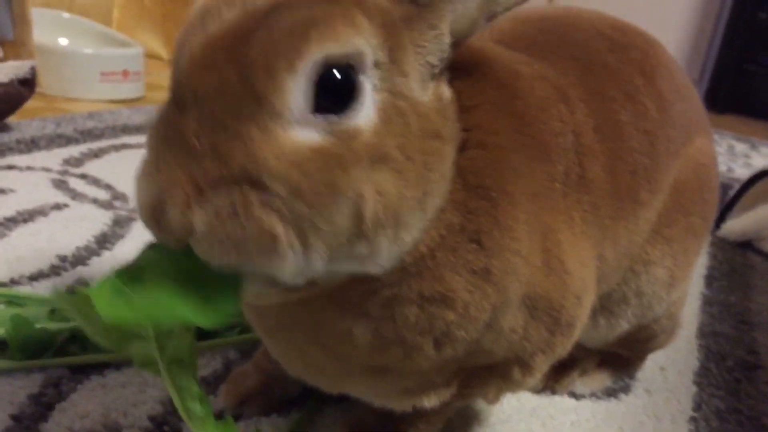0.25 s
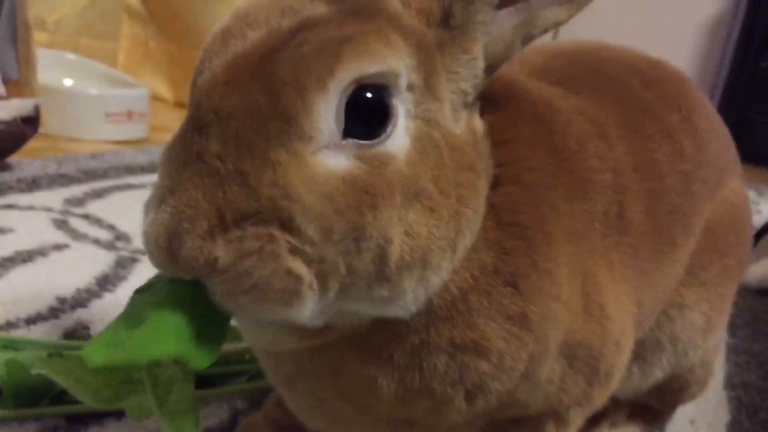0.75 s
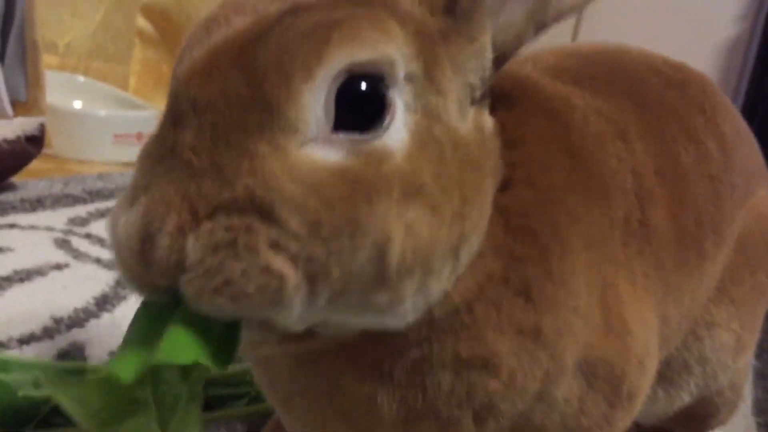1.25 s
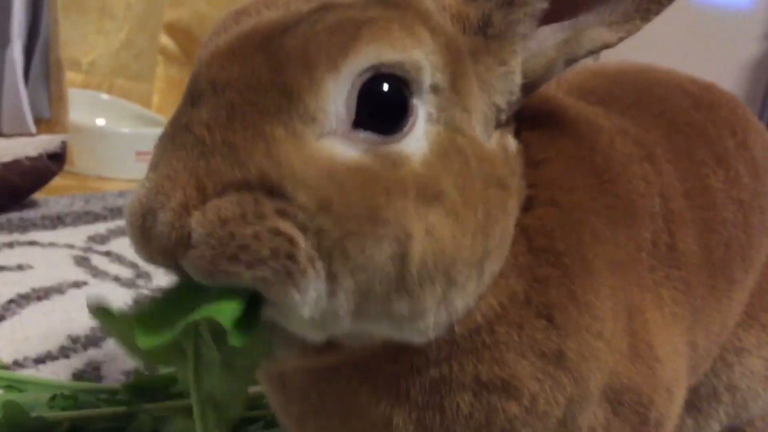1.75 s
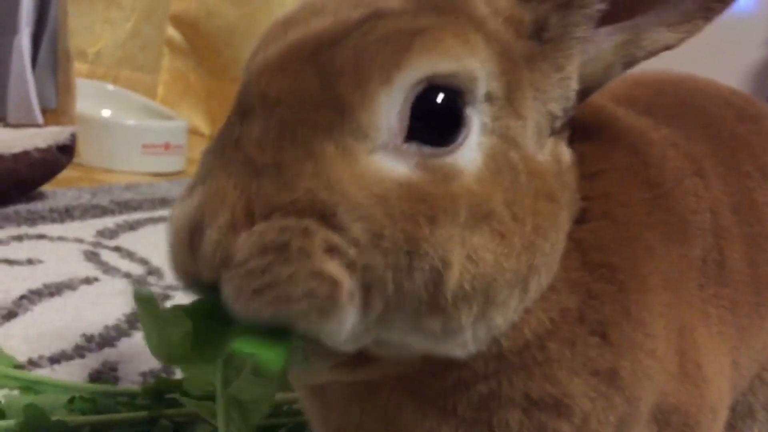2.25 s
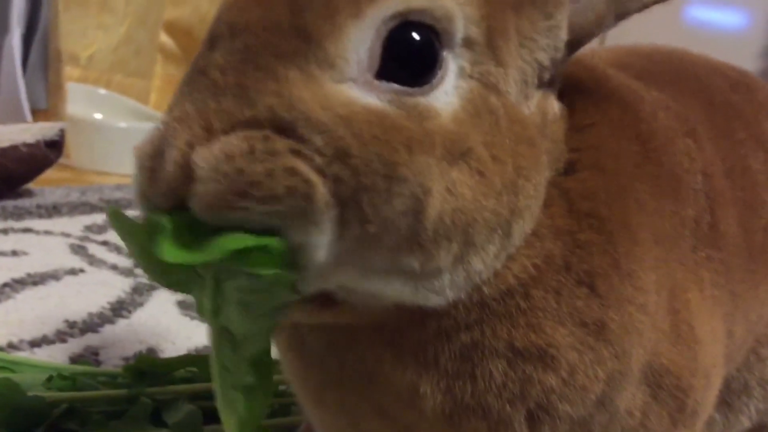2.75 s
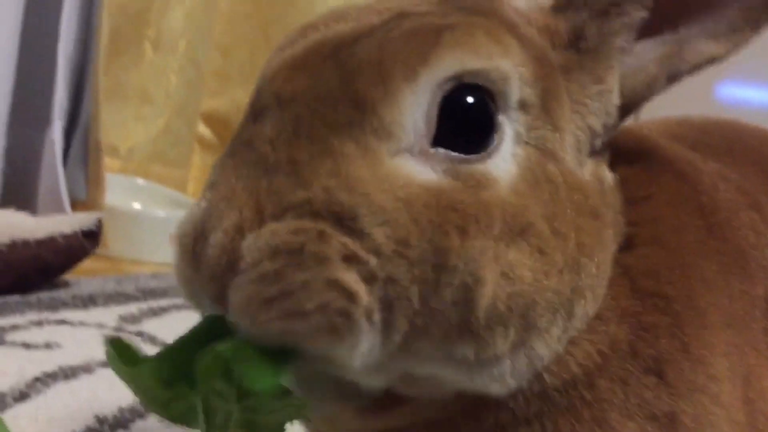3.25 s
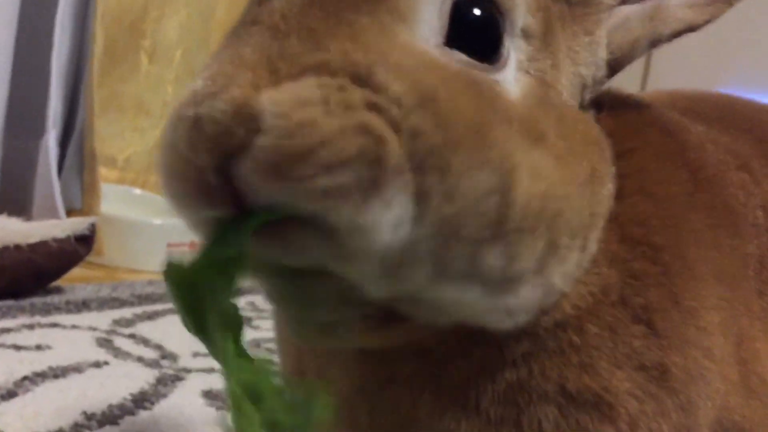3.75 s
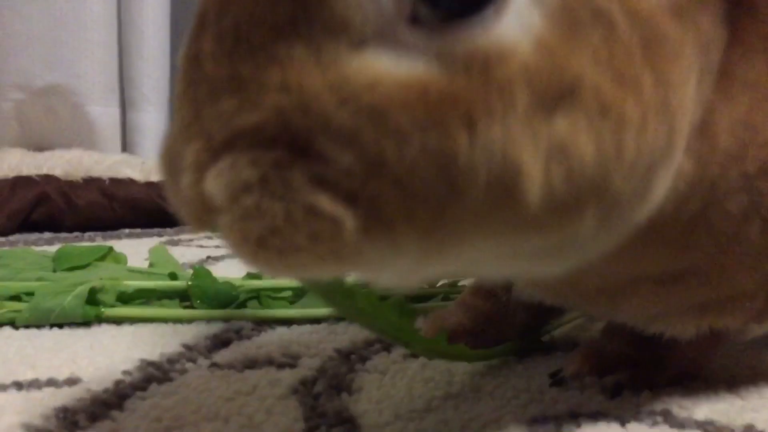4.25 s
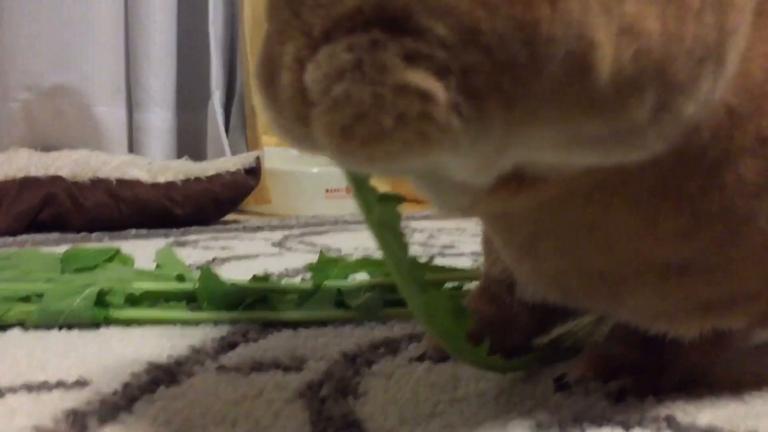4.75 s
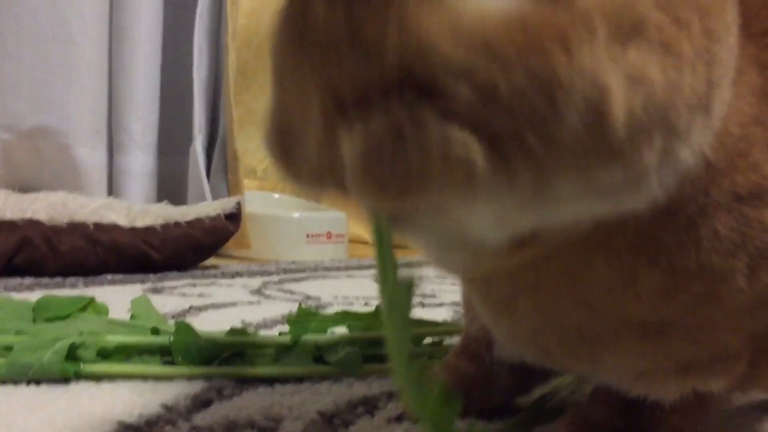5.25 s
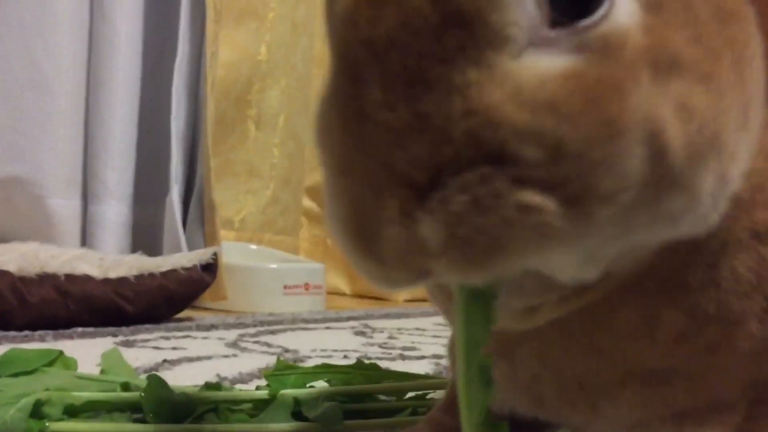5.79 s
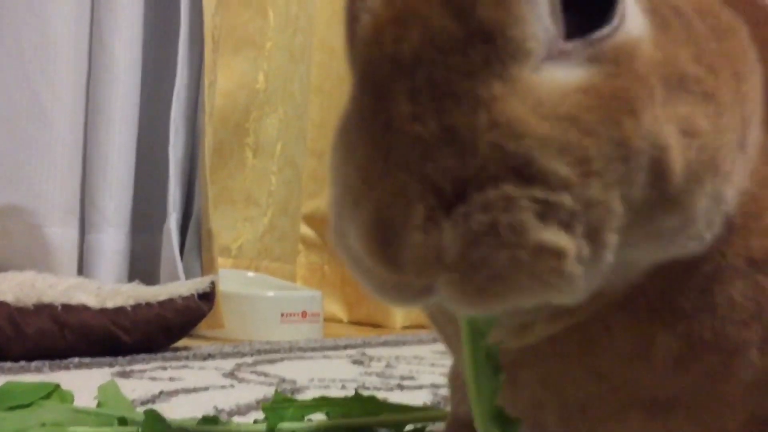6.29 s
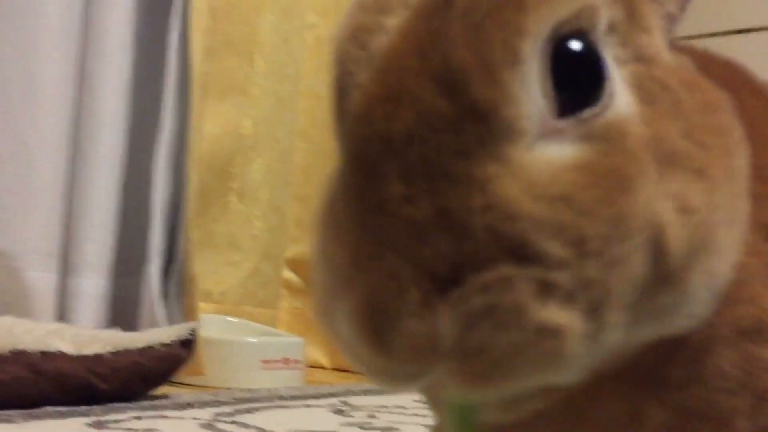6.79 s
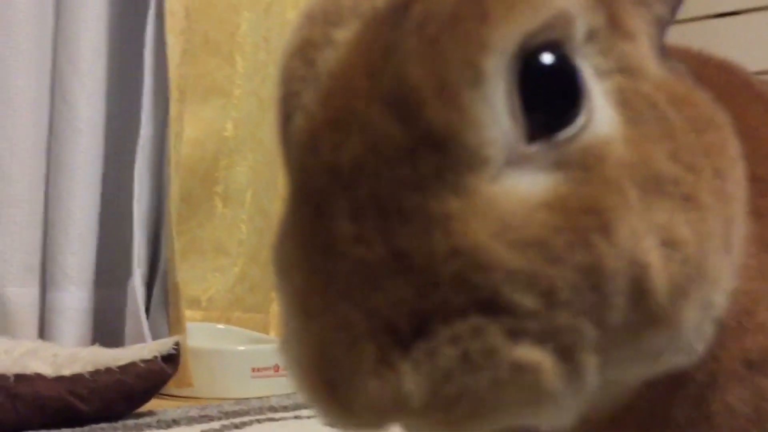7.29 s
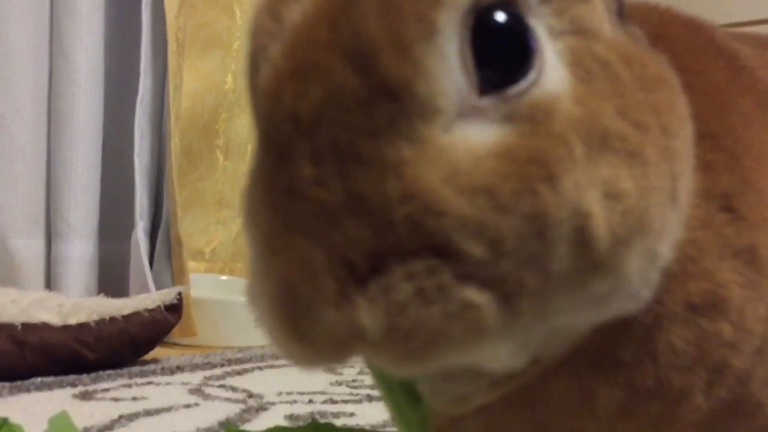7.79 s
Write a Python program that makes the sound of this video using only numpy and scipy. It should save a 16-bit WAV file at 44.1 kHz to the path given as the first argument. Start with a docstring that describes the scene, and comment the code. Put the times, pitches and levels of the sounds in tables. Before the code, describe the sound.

A rabbit munches leafy greens right at the microphone, quick crisp crunches with bright snaps and wet smacks, over a faint indoor hum.

```python
"""A rabbit chews leafy greens right at the microphone, about five bites a second.
Each crush bursts a cluster of crisp cells and slides on into a follow-up; fibres snap with a bright tick.
Wet pulp smacks in the mouth cavity while the molars keep up a faint squelch and crackle.
The handheld camera is tapped, bumped and brushed by fur now and then: dispersed knocks, thuds, slipping grains.
Behind it lie a faint mains hum, a low drone and still air."""
import sys
import numpy as np
from scipy import signal
from scipy.fft import rfft, irfft, next_fast_len
from scipy.io import wavfile
from scipy.ndimage import map_coordinates

SR = 44100
rng = np.random.default_rng(int(sys.argv[2]) if len(sys.argv) > 2 else 0)


def wav_out(sig):
    """Save sig, one row per channel (or a flat mono array), as 16-bit PCM at SR to the path in sys.argv[1]."""
    wavfile.write(sys.argv[1], SR, np.round(np.clip(np.atleast_2d(sig).T, -1, 1) * 32767).astype(np.int16))


N = 354123  # samples


def amp(db):
    """Decibels to a linear gain."""
    return 10 ** (np.asarray(db) / 20)


def unit(x):
    """x at an rms of one."""
    return x / np.sqrt(np.mean(x ** 2) + 1e-20)


def sized(x, db, seconds):
    """x with the energy of a sound that holds this level for this long."""
    return x * amp(db) * np.sqrt(seconds * SR / (np.sum(x ** 2) + 1e-20))


def around_zero(half):
    """Time axis in seconds, reaching this many samples either side of zero."""
    return np.arange(-half, half) / SR


def along(points, hz):
    """Read a curve of (f/Hz, value) points on a log frequency axis."""
    f, value = np.transpose(points)
    return np.interp(np.log(hz + 1), np.log(f + 1), value)


def add(track, s, x):
    """Mix x into the track from time s."""
    start = round(s * SR)
    a, b = max(start, 0), min(start + len(x), N)
    track[a:b] += x[a - start:b - start]


def wobble(rate):
    """A smooth random curve, rate knots a second."""
    knots = rng.standard_normal(int(N * rate / SR) + 4)
    return map_coordinates(knots, [np.arange(N) * rate / SR])


def response(gain_db, size=512, lag=lambda hz: 0):
    """Causal impulse response for a gain curve, with an optional extra phase lag in cycles."""
    hz = np.fft.rfftfreq(size, 1 / SR)
    # folding the cepstrum forward in time gives minimum phase
    cepstrum = irfft(np.log(amp(gain_db(hz)) + 1e-6))
    cepstrum[1:size // 2] *= 2
    cepstrum[size // 2 + 1:] = 0
    return irfft(np.exp(rfft(cepstrum) - 2j * np.pi * lag(hz)))


def coloured(x, spectrum, size=1024):
    """x through a spectrum that drops 20 dB in the octave beyond each end."""
    (low_hz, low_db), (high_hz, high_db) = spectrum[0], spectrum[-1]
    closed = [(low_hz / 2, low_db - 20), *spectrum, (high_hz * 2, high_db - 20)]
    return signal.fftconvolve(x, response(lambda hz: along(closed, hz), size))[:len(x)]


def band_limited(x):
    """A steep cut: nothing passes from 16.1 kHz up."""
    size = next_fast_len(len(x) + 256)
    passes = np.fft.rfftfreq(size, 1 / SR) < 16100
    return irfft(rfft(x, size) * passes, size)[:len(x)]


def bending(delay):
    """Phase lag in cycles of a bending wave that takes this long at 1 kHz: low notes travel slower."""
    return lambda hz: 2 * delay * np.sqrt(1e3 * hz)


def swell(t, length, skirt, attack=1.14):
    """A rise and fall around t = 0; the pressure builds faster than it lets go."""
    steepness = skirt / 2 * np.where(t < 0, attack, 1)
    return (1 + (2 * t / length) ** 4) ** -steepness


def grains(count, rate, spread_db):
    """Tiny impulses at random moments, rate a second, of random size and sign."""
    happens = rng.random(count) < rate / SR
    size = amp(spread_db * np.minimum(rng.standard_normal(count), 2))
    return happens * size * rng.choice([-1, 1], count)


def splinter(t60, ring):
    """One rupture: a jolt and a very short ring of random colour."""
    t = np.arange(SR // 200) / SR
    crack = ring * rng.standard_normal(len(t)) * amp(-60 * t / t60)
    crack[0] += 1
    return crack


def crackle(length, rate, spread_db, count):
    """Ruptures in several patches of tissue, each patch with its own colour."""
    patches = []
    for _ in range(count):
        ruptures = grains(length, rate / count, spread_db)
        patches.append(signal.fftconvolve(ruptures, splinter(t60=0.0029, ring=1.0))[:length])
    return unit(sum(patches))


# partials of the mains hum: f/Hz, mean level/dB rms
HUM_PARTIALS = [(60, -82), (120, -56), (180, -60), (240, -69.5)]
# colour of the still air: f/Hz, relative level/dB
AIR_COLOUR = [(25, -30.5), (48, -2.5), (100, 0), (185, -0.5), (330, -11.5), (775, -17.5), (2000, -19),
              (2900, -24), (4200, -20), (4900, -24), (6700, -28.5), (10400, -24.5), (13600, -30),
              (16000, -39)]


def room():
    """An appliance hums on the mains, a little unsteadily, over a low noise drone and still air."""
    t = np.arange(N) / SR
    hum = np.zeros(N)
    for hz, db in HUM_PARTIALS:
        level = np.sqrt(2) * amp(db + 0.53 * wobble(13))
        hum += level * np.sin(2 * np.pi * hz * t + 0.11 * wobble(2.06))
    # f/Hz, relative level/dB
    drone_colour = [(40, -15.5), (60, 2.5), (95, -11.0), (135, 1.0), (175, 3.5), (230, -10.5), (330, -17.5)]
    drone = unit(coloured(rng.standard_normal(N), drone_colour, size=8192))
    air = unit(coloured(rng.standard_normal(N), AIR_COLOUR, size=8192))
    return hum + amp(-58.0 + 0.51 * wobble(7.2)) * drone + amp(-53.5) * air


def nearby(x, t60, wet_db):
    """The bowl, floor and furniture scatter a short, weak answer: a decaying noise tail."""
    t = np.arange(SR // 8) / SR
    tail = rng.standard_normal(len(t)) * amp(-60 * t / t60) * (t > .001)
    return x + amp(wet_db) * signal.fftconvolve(x, tail / np.linalg.norm(tail))[:N]


# fur brushing the camera: centre t/s, length/s, level/dB, share of scrape [0-1]
BRUSH_STROKES = [(6.364, 0.11, -56.5, .1), (6.551, 0.31, -58.5, .1), (6.659, 0.11, -48.5, .05),
                 (6.884, 0.098, -44.5, 0.55), (6.971, 0.13, -57, 0.15)]
# colour of soft fur: f/Hz, relative level/dB
FUR_COLOUR = [(250, -2.5), (650, 2), (1200, 1.5), (2200, -1.5), (3000, -7.5), (4300, -6.5), (8000, -25),
              (13000, -20)]
# colour of the scrape: f/Hz, relative level/dB
SCRAPE_COLOUR = [(1000, -22), (1400, -6), (1850, -3), (2300, -16)]


def brushing():
    """Hairs slip over the case in short strokes of fine grains; each stroke has its own share of scrape."""
    out, t = np.zeros(N), around_zero(SR // 4)

    def slips(colour, length):
        """Hairs letting go one by one under a single stroke, at unit rms."""
        stroke = grains(len(t), rate=3100, spread_db=-2) * swell(t, length, skirt=2.4)
        return unit(coloured(stroke, colour))

    for s, length, db, scrape_share in BRUSH_STROKES:
        soft = (1 - scrape_share) * slips(FUR_COLOUR, length)
        scrape = scrape_share * slips(SCRAPE_COLOUR, length)
        add(out, s + t[0], sized(soft + scrape, db, length))
    return out


# sharp taps on the camera: t/s, level/dB (held for 7.9 ms), tilt/dB per octave,
# travel time at 1 kHz/s, rebound delay/s
CAMERA_TAPS = [(3.8507, -32, 1.6, 0.0006, 0.00057), (5.8205, -20.5, 2, 0.0011, 0.00032),
               (6.6482, -18, -0.63, 0.00131, 0.00036)]
# how the camera's case colours a tap, before the tilt: f/Hz, relative level/dB
CASE_COLOUR = [(25, -26), (52, 4.5), (95, 7.5), (320, -1.5), (450, -6), (620, 3.5), (800, -3.5),
               (1150, 2.5), (1480, -8.5), (1900, 1), (2800, -12.5), (4100, -15), (4900, -22), (6100, -30),
               (7500, -42), (16000, -53)]
# soft handling bumps, and the low-mid body of two of the taps:
# t/s, level of the swing before its fade/dB, f/Hz
BUMPS_AND_TAP_BODIES = [(0.346, -37, 72), (0.411, -40, 75), (0.612, -40, 80), (0.699, -38.5, 69),
                        (0.75, -37, 73), (3.777, -35, 111), (3.796, -38, 60), (3.8519, -31, 332),
                        (5.125, -40, 152), (5.428, -35.5, 91), (5.83, -24.5, 90.5), (5.979, -41.5, 77),
                        (6.306, -30.5, 131), (6.453, -31, 152), (6.652, -26.5, 340), (6.659, -28, 79),
                        (6.798, -35, 166)]


def handling():
    """Taps rebound and run through the camera's case, treble first; short swings give bumps and tap bodies."""
    out = np.zeros(N)
    for s, db, tilt, dispersion, rebound in CAMERA_TAPS:
        case = lambda hz: along(CASE_COLOUR, hz) + tilt * np.log2((hz + 20) / 1e3)
        knock = response(case, size=8192, lag=bending(dispersion))
        bounced = 0.43 * np.roll(knock, round(rebound * SR))
        add(out, s, sized(knock + bounced, db, 0.0079))
    t = around_zero(SR // 10)
    for s, db, hz in BUMPS_AND_TAP_BODIES:
        # the case swings out and back with no net push; lower swings last longer
        fade = np.exp(-(hz * t / 0.71) ** 2)  # down to 1/e after 0.71 cycles
        add(out, s + t[0], amp(db) * fade * np.sin(2 * np.pi * hz * t))
    return out


# how hard the molars grind: t/s, wet squelch level/dB, fine crackle level/dB (before trim and sway)
GRIND_LEVELS = [(0.0, -57.5, -53.5), (0.56, -62.5, -64.5), (1.41, -59, -59), (2.33, -55, -52.5),
                (2.57, -59.5, -54.5), (3.06, -60.5, -57.5), (3.84, -54, -50), (3.96, -56, -58),
                (4.25, -56.5, -58.5), (4.81, -65, -62), (5.46, -62, -65), (5.75, -55, -55),
                (6.19, -61, -62), (6.57, -62, -64), (7.2, -60.5, -58.5), (8.03, -62, -69)]
# colour of the wet squelch: f/Hz, relative level/dB
SQUELCH_COLOUR = [(300, -18.5), (700, -0.5), (1500, -6.5), (2300, 1), (3000, -1.5), (4200, -6), (7000, -18)]
# colour of the fine crackle: f/Hz, relative level/dB
CRACKLE_COLOUR = [(3000, -21), (5000, -3.5), (6200, -5.5), (8500, 0), (10500, 4), (12500, -7.5),
                  (16000, -8)]


def grinding():
    """The molars keep working the mouthful: a faint squelch and crackle that come and go."""
    t, trim_db = np.arange(N) / SR, -4.0
    s, squelch_db, crackle_db = np.transpose(GRIND_LEVELS)
    jaw = wobble(22)  # one jaw sways both layers
    squelch_sway_db = 1.5 * jaw + 1.5 * wobble(35)
    fizz_sway_db = 3 * jaw
    squelch = unit(coloured(grains(N, rate=3000, spread_db=8.5), SQUELCH_COLOUR))
    fizz = unit(coloured(crackle(N, rate=900, spread_db=7, count=6), CRACKLE_COLOUR))
    squelch *= amp(np.interp(t, s, squelch_db) + trim_db + squelch_sway_db)
    fizz *= amp(np.interp(t, s, crackle_db) + trim_db + fizz_sway_db)
    return squelch + fizz


# wet smacks: centre t/s (placed 1 ms ahead), length/s, level/dB, cavity f/Hz, width of each pass/Hz
MOUTH_SMACKS = [(0.955, 0.0077, -51.5, 4200, 1100), (1.366, .015, -55, 263, 90),
                (2.153, 0.0078, -51, 840, 600), (2.26, .005, -47, 2420, 900),
                (2.307, 0.017, -42, 2940, 600), (2.455, 0.011, -43, 5200, 1400),
                (3.072, 0.0019, -32.5, 2250, 900), (3.085, 0.0039, -45, 370, 200),
                (3.314, .02, -57, 650, 250), (3.488, 0.022, -45.5, 2320, 500),
                (3.715, .029, -58, 1970, 400), (4.01, 0.051, -55.5, 1860, 450),
                (4.237, .04, -52.5, 2500, 900), (4.527, 0.025, -56, 1490, 500),
                (5.022, 0.0029, -50, 1040, 1100), (5.156, 0.0051, -52.5, 800, 600),
                (5.576, .027, -46, 1290, 940), (5.911, .009, -54.5, 770, 350),
                (6.102, .0058, -52.5, 930, 350), (7.061, 0.0082, -46, 380, 200),
                (7.2738, 0.0034, -23, 4500, 2200), (7.492, 0.0056, -39, 1420, 1100),
                (7.643, 0.0029, -41.5, 1540, 700), (7.782, 0.0052, -45, 454, 140)]


def smacks():
    """Wet lips and pulp excite the mouth cavity, whose resonance shifts with the jaw."""
    out, t = np.zeros(N), around_zero(SR // 10)
    for s, length, db, hz, width_hz in MOUTH_SMACKS:
        burst = grains(len(t), rate=6300, spread_db=6.5) * swell(t, length, skirt=1.56)
        b, a = signal.iirpeak(hz, hz / width_hz, SR)
        once = signal.lfilter(b, a, burst)
        twice = signal.lfilter(b, a, once)
        add(out, s - .001 + t[0], sized(twice, db, length))
    return out


def snap_colour(pitch_hz, width):
    """A hump around the fibre's pitch, over a faint broad click."""
    hump = lambda hz: -2.4 * (np.log2((hz + 1) / pitch_hz) / width) ** 2
    click = lambda hz: -32 - 9 * np.log2(1 + 700 / (hz + 1))
    return lambda hz: np.maximum(hump(hz), click(hz))


# single fibres breaking: t/s, level/dB (held for 1.8 ms, before the layer trim), f/Hz,
# half-width of the hump/octaves (where it is 2.4 dB down)
FIBRE_SNAPS = [(0.2553, -38.5, 6600, 3.2), (0.3997, -38, 8100, .36), (0.4176, -24.5, 6700, .75),
               (0.4228, -35, 10000, 1.5), (0.534, -42.5, 12300, .33), (0.5945, -29, 11900, 0.34),
               (0.7455, -29.5, 13400, 0.34), (0.7777, -32.5, 11400, 0.55), (0.9556, -27.5, 10900, 0.25),
               (1.3157, -29.5, 12000, .3), (1.324, -30.5, 10200, 0.17), (1.6974, -33, 9250, 0.3),
               (1.9275, -35, 7800, .15), (1.964, -31, 12300, 0.14), (2.0683, -32, 13100, 0.18),
               (2.1186, -27, 6860, .43), (2.4837, -28.5, 9000, .4), (2.4914, -20.5, 7240, 1.3),
               (3.0704, -24.5, 5930, 0.78), (3.085, -23, 6300, 1.5), (3.4734, -30, 9500, 0.23),
               (3.488, -32, 9300, 1.5), (3.7054, -26, 10800, 0.56), (3.8512, -36.5, 7000, 1.8),
               (3.8883, -30, 11700, 0.15), (4.02, -32.5, 8800, 0.19), (4.352, -31, 9300, .15),
               (4.709, -36, 7300, 1.4), (4.72, -21.5, 8250, 0.47), (4.73, -24, 9300, 1.5),
               (4.7475, -20.5, 7550, .44), (4.748, -26, 10800, 0.64), (4.7659, -27, 7040, 0.46),
               (4.7692, -40, 5900, 1.9), (5.068, -46, 8500, 1.8), (5.469, -37, 11000, 0.45),
               (5.5657, -29, 4870, 2.9), (5.7497, -27, 11000, 0.46), (5.9283, -24, 11400, 0.62),
               (6.1152, -28, 6800, 1.3), (6.1171, -20.5, 6640, 0.33), (6.15, -30.5, 9500, 1.7),
               (6.33, -27.5, 8100, .37), (6.3442, -31, 8600, 1.4), (6.6152, -34, 12800, 0.24),
               (6.805, -32, 13500, .18), (7.1384, -41, 6400, 0.35), (7.246, -32, 8800, .64),
               (7.2739, -27, 5500, 2.8), (7.3037, -40, 9600, 0.62), (7.4884, -26.5, 5040, 0.19),
               (7.6282, -30, 8000, 0.88), (7.641, -27, 8000, 0.76), (7.745, -30.5, 12000, .2),
               (7.9292, -34.5, 5800, 4.2)]


def snaps():
    """A fibre breaks in a jolt and a brief tear; the stalk carries its treble out ahead of its lows."""
    out, t = np.zeros(N), np.arange(SR // 100) / SR
    release = amp(-60 * t / .0019) + .1 * amp(-60 * t / .014)  # quick break, faint longer tail
    for s, db, pitch_hz, width in FIBRE_SNAPS:
        tear = rng.standard_normal(len(t)) * release
        tear[0] += 2.4
        stalk = response(snap_colour(pitch_hz, width), lag=bending(0.000615))
        snap = band_limited(signal.fftconvolve(tear, stalk))
        add(out, s, sized(snap, db, 0.0018))
    return amp(-2.04) * out


# one row per crush, each with a follow-up crush: t/s, length/s,
# level/dB (before part levels and layer trim), brightness/dB, follow-up over the first/dB
CRUSH_ROWS = [(0.193, 0.034, -46, 2, -2.5), (0.405, 0.05, -46, 0.5, -8), (0.602, 0.035, -51.5, 1, -7.5),
              (0.756, 0.048, -52, 3, -13), (0.851, .01, -49, 6, -19), (0.937, 0.038, -54, 10, -15),
              (1.134, .038, -47, -1.5, -24), (1.327, 0.048, -48.5, 1, -14), (1.52, .027, -47.5, 0.5, -4),
              (1.697, 0.013, -41.5, 0.5, -7), (1.912, 0.05, -48.5, -5, -10), (1.967, 0.014, -47, 10, -15),
              (2.07, 0.02, -42.5, 12, -9), (2.112, .021, -45, -7.5, -10), (2.287, 0.038, -37, -2, -14),
              (2.384, 0.013, -50.5, 1, -15), (2.486, 0.03, -43, -8, -17), (2.543, .006, -46, -2, -18),
              (3.075, 0.036, -46, -9, -35), (3.342, 0.011, -52, 3, 1), (3.494, 0.049, -45.5, 0, -24),
              (3.623, .022, -52.5, -4, -11), (3.667, .02, -48, 13, -15), (3.714, 0.029, -36.5, -1, -17),
              (3.768, 0.011, -48, 5, -18), (3.862, 0.037, -42.5, 1, -16), (3.956, 0.023, -53, 7, -8),
              (4.017, 0.043, -48, -4, -8), (4.148, .014, -51.5, 2, -10), (4.208, 0.041, -51.5, 3, -9),
              (4.364, .032, -54, 2, -18), (4.543, .027, -52.5, -3, -10), (4.716, 0.024, -44, -6, -2),
              (4.959, 0.02, -53.5, 15, -25), (5.175, 0.063, -57, 10, -17), (5.563, 0.045, -45.5, 3, -24),
              (5.7203, .006, -41.5, -3, -14), (5.757, 0.03, -49, 1, -13), (5.935, 0.036, -45.5, 5, -29),
              (6.114, .013, -40, -4, -9), (6.146, 0.022, -42, 3, -27), (6.346, 0.052, -49.5, -3, -25),
              (6.464, 0.024, -49, -3, -24), (7.073, .043, -46.5, 0.5, -17), (7.253, 0.015, -38.5, 4, -7),
              (7.483, 0.041, -46, 2, -29), (7.629, 0.041, -48.5, 0, -29), (7.774, 0.028, -52, 3, -19)]


def crushes():
    """The jaw slides on and crushes again: two crushes a row of (t/s, length/s, level/dB, brightness/dB)."""
    for s, length, db, bright_db, follow_up_db in CRUSH_ROWS:
        yield s, length, db, bright_db
        # a fixed pause plus a share of the first crush's length later
        yield s + .022 + .85 * length, .022, db + follow_up_db, bright_db


# colour of crushed wet pulp: f/Hz, relative level/dB
PULP_COLOUR = [(150, -14), (400, -0.5), (700, 1), (1200, 1), (1600, 1), (2400, -30)]
# colour of crushed stem: f/Hz, relative level/dB
STEM_COLOUR = [(1200, -47), (1800, 14.5), (2400, 13), (3100, 16), (4000, 17), (5500, -17)]
# colour of crushed leaf: f/Hz, relative level/dB
LEAF_COLOUR = [(3000, -13.5), (4800, -3.5), (5800, -0.5), (7000, -2.5), (8000, -1.5), (9300, 5.5),
               (10500, 0), (13000, -11.5)]
# colour of crushed skin: f/Hz, relative level/dB
SKIN_COLOUR = [(8000, -44.5), (10500, -2.5), (12000, 3.5), (14000, -0.5), (15600, -5), (17000, -35)]
# how brightness shifts each part: pulp, stem, leaf, skin [dB per dB of brightness]
BRIGHTNESS_SHIFT = (-0.22, -0.68, -0.34, 0.52)
# level of each part against the crush, before the brightness shift/dB
BLADE_PULP_DB, STALK_PULP_DB, STEM_DB, LEAF_DB, SKIN_DB = -18, -7.5, -8.5, 1, 0
STALK_FROM_S = 4.3  # leaf blade up to here, juicier stalk after


def bites():
    """Each crush bursts a cloud of cells; the same ruptures sound in pulp, stem, leaf and skin."""
    out, t = np.zeros(N), around_zero(SR // 10)
    colours = (PULP_COLOUR, STEM_COLOUR, LEAF_COLOUR, SKIN_COLOUR)
    wetness = (0.31, 0.28, 0.21, 0.18)
    for s, length, crush_db, bright_db in crushes():
        pulp_db = STALK_PULP_DB if s > STALK_FROM_S else BLADE_PULP_DB
        part_db = np.array([pulp_db, STEM_DB, LEAF_DB, SKIN_DB])
        levels = crush_db + part_db + bright_db * np.array(BRIGHTNESS_SHIFT)
        cells = crackle(len(t), rate=1150, spread_db=6, count=4) * swell(t, length, skirt=1.75)
        for colour, db, wet in zip(colours, levels, wetness):
            # fine fizz under the ruptures
            juice = unit(grains(len(t), rate=4300, spread_db=2.5)) * swell(t, length, skirt=0.7)
            add(out, s + t[0], sized(coloured(cells + wet * juice, colour), db, length))
    return amp(-1.8) * out


def scene():
    """The chewing with its short scatter, over handling, brushing and the room."""
    mouth = bites() + snaps() + smacks() + grinding()
    chewing = nearby(mouth, t60=0.046, wet_db=-11.5)
    return (chewing + handling() + brushing() + room())[None]


# tone of the microphone: f/Hz, gain/dB
MICROPHONE_TONE = [(3000, 0), (4700, -2.5), (6200, 4), (9200, -2), (10400, -6), (11800, 1.5), (15500, 1)]


def record(dry):
    """One small microphone with a dip in its treble, cut off steeply at the top."""
    heard = signal.fftconvolve(dry[0], response(lambda hz: along(MICROPHONE_TONE, hz)))[:N]
    return band_limited(heard)[None]


dry = scene()
out = record(dry)
wav_out(out)
```